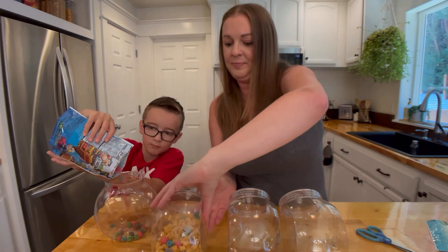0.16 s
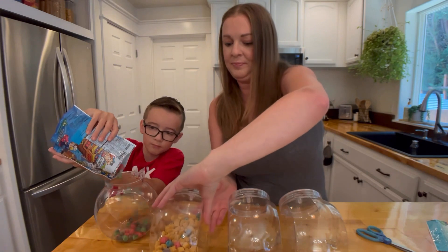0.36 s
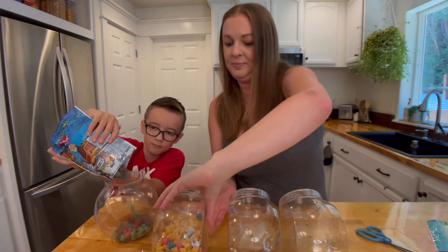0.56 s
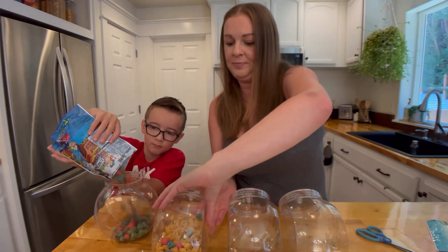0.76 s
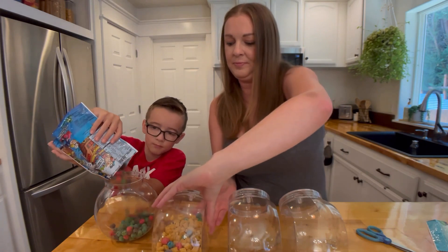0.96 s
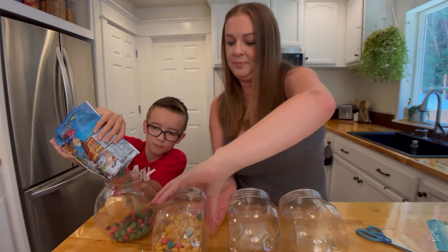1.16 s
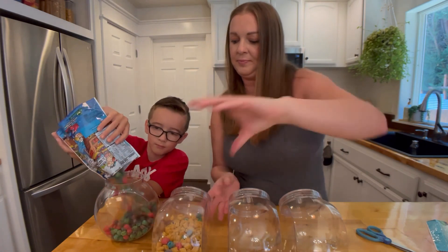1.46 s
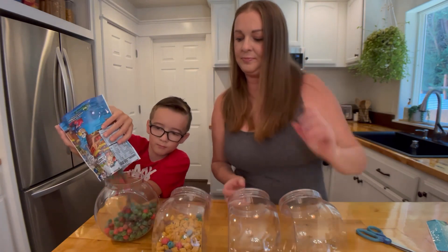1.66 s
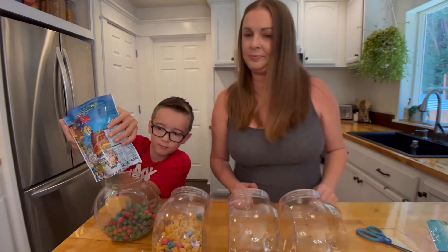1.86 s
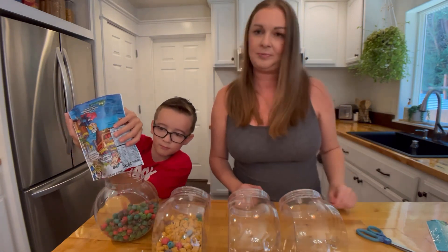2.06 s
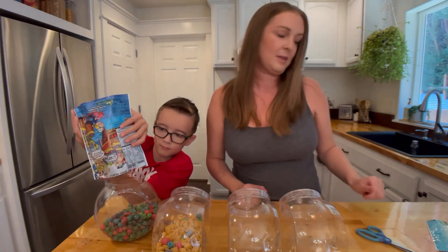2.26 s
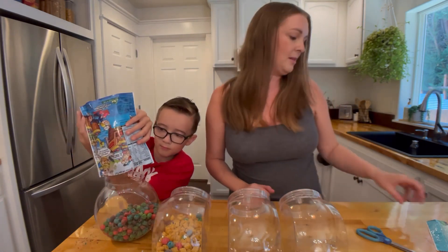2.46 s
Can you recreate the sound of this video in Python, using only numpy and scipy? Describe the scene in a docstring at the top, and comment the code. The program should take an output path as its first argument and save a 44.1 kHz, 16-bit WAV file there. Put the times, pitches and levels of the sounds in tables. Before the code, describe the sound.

Dry cereal pours into a plastic jar, close and slightly left. Bright separate ticks and a soft low counter knock open it; from 0.2 to 0.8 seconds a dense rattle drums the hollow base and wall. Duller clatter on the growing pile continues, weakening by 1.9 seconds, then sparse, very faint clicks until about 2.6. Low fridge hum and short kitchen reverberation lie beneath.

```python
"""A fridge hums in a kitchen while dry cereal pours from a pouch into a plastic jar on the counter.
Near the start a low knock goes through the counter: a sine that sinks in pitch and dies away.
Every piece ticks (short notes and a hiss) and rings the jar's base; the thicker stream also drums its wall.
Dull clatter grows with the pile, then the stream thins to single clicks; decaying noise is the kitchen's answer.
The jar stands left of a two-port microphone whose right port has a sharp resonance."""
import sys
import numpy as np
from scipy import signal
from scipy.fft import rfft, irfft, next_fast_len
from scipy.io import wavfile
from scipy.ndimage import map_coordinates

SR = 44100
rng = np.random.default_rng(int(sys.argv[2]) if len(sys.argv) > 2 else 0)


def volts_from_decibels(level):
    """Turn decibel levels (scalar or array-like) into linear amplitude factors."""
    exponent = np.asarray(level, float) / 20
    return 10 ** exponent


def dump(signal):
    """Clip the signal to [-1, 1] and save it as 16-bit WAV at the path in sys.argv[1]."""
    limited = np.clip(np.atleast_2d(signal).T, -1, 1)
    pcm = np.round(limited * 32767).astype(np.int16)
    wavfile.write(sys.argv[1], SR, pcm)


N = 114660  # length in samples


def unit(x):
    """Scale to an rms of 1."""
    return x / np.sqrt(np.mean(x ** 2) + 1e-20)


def along(points, hz):
    """Read a curve of (pitch_hz, value) points, joined by straight lines on a log pitch axis."""
    point_hz, value = np.transpose(points)
    return np.interp(np.log(hz + 1), np.log(point_hz + 1), value)


def wobble(knots_per_s):
    """A smooth random curve through random knots."""
    knots = rng.standard_normal(int(N * knots_per_s / SR) + 4)
    return map_coordinates(knots, [np.arange(N) * knots_per_s / SR])


def filtered(x, response):
    """Multiply the spectrum of x by a response, given as a function of frequency."""
    size = next_fast_len(N + 8192)
    spectrum = rfft(x, size) * response(np.fft.rfftfreq(size, 1 / SR))
    return irfft(spectrum, size)[..., :N]


# Colour of the room tone: pitch_hz, level_db (per Hz, relative)
AIR_COLOUR = [(40, -49), (127, 0), (489, -11.5), (900, -22.5), (1560, -6.5), (4610, -34), (12500, -38),
              (16000, -75)]


def room_tone():
    """Steady coloured noise, partly shared by the two ports."""
    shared, differing = rng.standard_normal((2, N))
    ports = np.array([shared + 0.75 * differing, shared - 0.27 * differing])
    return volts_from_decibels(-56) * unit(filtered(ports, lambda hz: volts_from_decibels(along(AIR_COLOUR, hz))))


def fridge_hum():
    """A low sine whose level and phase waver."""
    t = np.arange(N) / SR
    level = volts_from_decibels(-57.5 + 4.5 * wobble(2.9))
    return level * np.sin(2 * np.pi * 58 * t + 2.5 * wobble(5))


def counter_knock():
    """A low knock through the counter: a dying sine that starts higher and sinks."""
    start_s, level_db, t60_s = 0.065, -35, 0.74
    first_hz, last_hz, sink_s = 211, 54.5, 0.0095
    t = np.maximum(np.arange(N) / SR - start_s, 0)
    cycles = last_hz * t + (first_hz - last_hz) * sink_s * (1 - np.exp(-t / sink_s))
    return volts_from_decibels(level_db - 60 * t / t60_s) * np.sin(2 * np.pi * cycles)


# How long the kitchen's answer lasts: pitch_hz, t60_s (time to fall by 60 dB)
KITCHEN_T60 = [(200, 0.47), (3000, 0.54), (12000, 0.12)]


def kitchen(x):
    """Each frequency of the room's answer dies at its own speed; the answer's noise differs at each port."""
    level_db, delay_s = -7.5, 0.005
    hz, t, z = signal.stft(rng.standard_normal((2, SR // 2)), SR, nperseg=256)
    fall = volts_from_decibels(-60 * t / along(KITCHEN_T60, hz)[:, None])
    tail = signal.istft(z * fall, SR, nperseg=256)[1]
    tail = tail / np.linalg.norm(tail[0])
    late = np.pad(x, (int(delay_s * SR), 0))[None]
    return volts_from_decibels(level_db) * signal.fftconvolve(late, tail, axes=1)[:, :N]


def rings(at, gain, modes):
    """Each blow kicks every mode with its own strength; the ring swells briefly, then dies."""
    rise_s, spread_db = 0.0037, 2.5
    own = volts_from_decibels(spread_db * rng.standard_normal((len(at), len(modes))))
    out = np.zeros(N)
    for k, (hz, db, t60) in enumerate(modes):
        kicks = np.bincount(at, gain * own[:, k], N)
        w = 2 * np.pi * hz / SR
        slow = 1000 ** (-1 / (t60 * SR))
        fast = slow * np.exp(-1 / (rise_s * SR))
        # taking away a faster-dying copy makes the swell
        for weight, pole in ((0.91, slow), (-0.98, fast)):
            resonator = [1, -2 * pole * np.cos(w), pole * pole]
            out += weight * volts_from_decibels(db) * signal.lfilter([0.5, 0, -0.5], resonator, kicks)
    return out


# Ways the jar's wall vibrates: pitch_hz, level_db (relative), t60_s
WALL_MODES = [(167, -21.5, .12), (354.8, -1.5, 0.17), (393, -4, 0.13), (441, -1.5, 0.14), (489.3, -1, .17),
              (549, -10, 0.14), (626, -11.5, 0.095), (702.3, -2.5, 0.11), (789, -7, 0.083)]


def jar_wall(at, gain):
    """Blows drum the wall, which rings at its low modes."""
    return rings(at, gain, WALL_MODES)


# Ways the jar's base vibrates: pitch_hz, level_db (relative), t60_s
BASE_MODES = [(1398, -11, 0.055), (1510, -10.5, 0.051), (1562, 10, 0.017), (1613, -14, 0.063)]


def jar_base(at, gain):
    """Blows ring the base, which is higher in pitch than the wall."""
    return rings(at, gain, BASE_MODES)


# Centres of the bands that each burst weights anew: pitch_hz
BURST_BANDS = (1000, 3000, 6000, 12000)


def bursts(at, gain, t60, colour, own_db):
    """A short burst of coloured noise at each contact, its bands weighted anew each time."""
    unlike = 0.39  # weight of the noise that is opposite at the two ports
    count = len(BURST_BANDS)
    own = unit(volts_from_decibels(own_db * rng.standard_normal((len(at), count))))
    power = np.array([np.bincount(at, (gain * g) ** 2, N) for g in own.T])
    fall = signal.lfilter([1], [1, -1000 ** (-2 / (t60 * SR))], power)

    def shape(hz):
        return volts_from_decibels(along(colour, hz))

    def bands(hz):
        # neighbouring bands cross-fade so that their powers add to one
        return np.sqrt([along(list(zip(BURST_BANDS, row)), hz) for row in np.eye(count)])

    noise = np.sqrt(fall) * rng.standard_normal((2, *fall.shape))
    common, opposite = filtered(noise, lambda hz: shape(hz) * bands(hz)).sum(1)
    loudness = np.sqrt(np.mean(shape(np.arange(SR // 2)) ** 2))
    return (common + unlike * opposite * [[1], [-1]]) / loudness


# Colour of the clatter on the pile: pitch_hz, level_db (per Hz, relative)
PILE_COLOUR = [(130, -25.5), (350, -1.5), (700, 1), (1100, -5), (1600, -2.5), (2200, -11.5), (4000, -30.5),
               (12000, -78)]


def pile_clatter(at, gain, t60, own_db):
    """Dull noise bursts where pieces hit the growing pile."""
    grown = np.minimum(at / SR / 0.46, 1) ** 2  # full strength after 0.46 s
    return bursts(at, gain * volts_from_decibels(9) * grown, t60, PILE_COLOUR, own_db)


def clacks(at, gain):
    """Each piece rings two short notes of its own, lower as the pile grows."""
    base_hz, pile_hz, pile_full_s = 3700, 2650, 2.08
    log_spread, cycles_to_60_db, low_hz = 0.24, 32, 1290
    t = np.arange(SR // 100) / SR
    centre = np.interp(at / SR, [0, pile_full_s], [base_hz, pile_hz])
    hz = centre[:, None, None] * np.exp(log_spread * rng.standard_normal((len(at), 2, 1)))
    swell = 1 - np.exp(-hz * t / 2)
    fall = volts_from_decibels(-60 * hz * t / cycles_to_60_db)
    notes = (np.sin(2 * np.pi * hz * t) * swell * fall).sum(1)
    places = at[:, None] + np.arange(len(t))
    out = np.bincount(places.ravel(), (gain[:, None] * notes).ravel(), N + len(t))[:N]
    # the notes carry little below low_hz
    return volts_from_decibels(-0.5) * filtered(out, lambda f: (1j * f / (low_hz + 1j * f)) ** 2)


TICK_T60_S = 0.011
# Colour of a tick's hiss: pitch_hz, level_db (per Hz, relative)
TICK_COLOUR = [(800, -10.5), (1700, -10), (2200, 0.5), (4000, -12), (6300, -14.5), (7600, -19.5),
               (9800, -17.5), (13000, -14), (13700, -29), (14800, -76)]


def ticks(at, gain, own_db):
    """A contact makes the piece's own notes and a short hiss."""
    return clacks(at, gain) + bursts(at, gain, TICK_T60_S, TICK_COLOUR, own_db)


# The loudest landings: start_s, tick_db, base_over_tick_db, wall_over_tick_db (both before a fixed trim)
LOUD_LANDINGS = [(0.0108, -19, 17.5, -7), (0.0573, -20.5, -28, 0), (0.0787, -14, 13, -5.5),
                 (0.1789, -12, 5, -46), (0.1862, -21, 22.5, -1.5), (0.2045, -24, 11.5, 4),
                 (0.214, -9, 8, -10), (.2290, -18, 14.5, -3), (0.288, -26.5, 18.5, 21),
                 (0.3138, -18.5, 16.5, -27), (0.3652, -24.5, 21.5, 8), (0.4174, -15.5, 8, 8.5),
                 (0.4445, -21.5, 16.5, 4.5), (0.525, -22.5, 15, 13), (.546, -25.5, 18.5, 19),
                 (0.5711, -24, 5, 22.5), (.617, -22.5, 7, 12.5), (0.6464, -18.5, 11.5, -1),
                 (0.679, -18, 19, 12), (0.7319, -31.5, 21.5, 25), (1.0941, -18, 4.5, 8.5),
                 (1.1454, -18, 4, -2), (1.239, -20.5, 10.5, 10.5), (1.406, -28, 10.5, 2),
                 (1.477, -22.5, 9, 10.5), (1.5696, -24.5, -5, 3), (1.7662, -29.5, 3, 10),
                 (1.9965, -30.5, 4.5, 1.5), (2.1452, -36, -1, -26), (2.226, -36.5, 4, -15),
                 (2.257, -47, 10, -12), (2.298, -48, -7, -15), (2.379, -48, 9, -26),
                 (2.4852, -44.5, 12.5, 13), (2.5674, -46, 17.5, -22)]


def landings():
    """Single loud pieces tick and kick the jar's base and wall."""
    base_trim_db, wall_trim_db = -2, -8
    start_s, tick_db, base_db, wall_db = np.transpose(LOUD_LANDINGS)
    at = np.round(start_s * SR).astype(int)
    tick = ticks(at, volts_from_decibels(tick_db), own_db=2.5)
    base = jar_base(at, volts_from_decibels(tick_db + base_db + base_trim_db))
    wall = jar_wall(at, volts_from_decibels(tick_db + wall_db + wall_trim_db))
    return tick + base + wall


# Flow of small pieces: time_s, tick_db, base_over_tick_db, wall_over_tick_db (both before a fixed trim)
FLOW = [(0, -46, 19, -7), (.16, -42.5, -1, -7), (.2, -29, -20, -27), (0.276, -34.5, 11, -1),
        (.295, -36.5, 6, 28), (0.44, -33, 20, 11), (0.497, -44.5, 5, 28), (.57, -37.5, 17.5, 24.5),
        (0.792, -41.5, 15.5, 22), (.83, -42, 11, 22.5), (1.3, -39, 6.5, 6), (1.92, -45, -4, 15.5),
        (2.08, -56, 10, 13), (2.3, -71, 10, 9), (2.6, -68.5, 4, -14)]


def stream():
    """Random landings, louder and softer in clumps, follow the flow; later ones fall on the pile."""
    pieces_per_s, size_db, largest_db = 700, 4.5, 11
    clump_db, clumps_per_s = 1.5, 45
    base_trim_db, wall_trim_db = -4, -18
    pile_t60_s, own_db = 0.035, 4.5
    draws = rng.random((int(pieces_per_s * N / SR), 2))
    at = (draws[:, 0] * (N - 1)).astype(int)
    piece_db = np.minimum(-size_db * np.log(1 - draws[:, 1]), largest_db)
    size = volts_from_decibels(piece_db + clump_db * wobble(clumps_per_s)[at])
    time_s, *columns = np.transpose(FLOW)
    tick_db, base_db, wall_db = (np.interp(at / SR, time_s, column) for column in columns)
    kick = unit(size) * volts_from_decibels(tick_db)

    def overlap(t60):
        # rms level that many dying bursts build up together
        return np.sqrt(pieces_per_s * t60 / (2 * np.log(1000)))

    tick = ticks(at, kick / overlap(TICK_T60_S), own_db)
    pile = pile_clatter(at, kick / overlap(pile_t60_s), pile_t60_s, own_db)
    base = jar_base(at, kick * volts_from_decibels(base_db + base_trim_db))
    wall = jar_wall(at, kick * volts_from_decibels(wall_db + wall_trim_db))
    return tick + pile + base + wall


# Colour of the two ports: pitch_hz, left_over_right_db
PORT_COLOUR = [(330, -1), (700, 2.5), (1200, -2), (1580, -13), (2000, 2), (3300, 7), (5500, 6.5),
               (9500, -2.5)]


def at_ports(jar):
    """The jar reaches the left port first, the kitchen answers, and each port colours both."""
    left_lead_s = 0.0002
    side = np.array([[1], [-1]]) / 2
    near = filtered(jar, lambda hz: np.exp(2j * np.pi * hz * left_lead_s * (side - 1)))
    heard = near + kitchen(jar.mean(0))
    return filtered(heard, lambda hz: volts_from_decibels(side * along(PORT_COLOUR, hz)))


def scene():
    """The pouring at the two ports, over room tone, fridge hum and the knock."""
    background = room_tone() + fridge_hum() + counter_knock()
    return background + at_ports(landings() + stream())


# Width of the stereo image: pitch_hz, side_level_db
STEREO_WIDTH = [(6000, -0.5), (9000, 1), (12000, -26)]


def narrow_treble(dry):
    """The difference between left and right is turned down in the high treble."""
    mid = dry.mean(0)
    side = filtered((dry[0] - dry[1]) / 2, lambda hz: volts_from_decibels(along(STEREO_WIDTH, hz)))
    return np.array([mid + side, mid - side])


def low_pass(x):
    """Removes everything above the highest recorded frequency."""
    return signal.sosfilt(signal.butter(12, 16500, fs=SR, output="sos"), x)


def record(dry):
    """The stereo image narrows in the treble before the finished mix is stored."""
    mix = narrow_treble(dry)
    return low_pass(mix)


dry = scene()
out = record(dry)
dump(out)
```